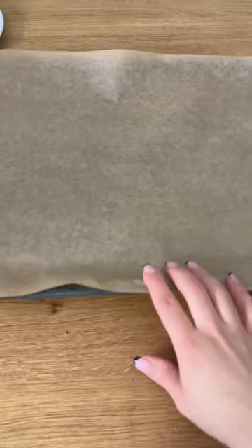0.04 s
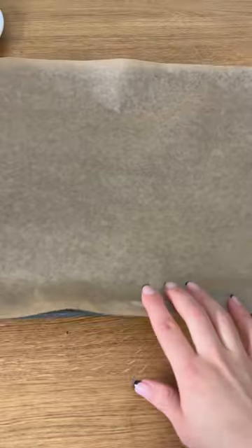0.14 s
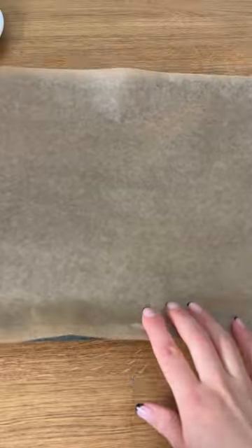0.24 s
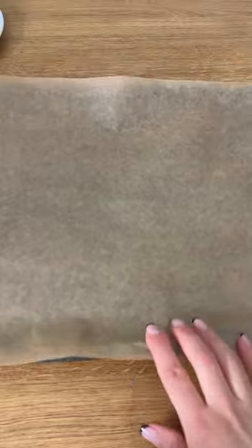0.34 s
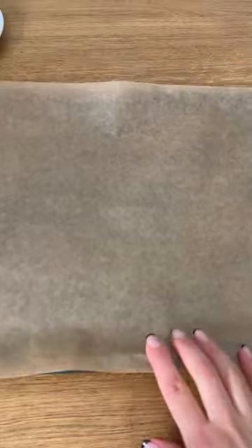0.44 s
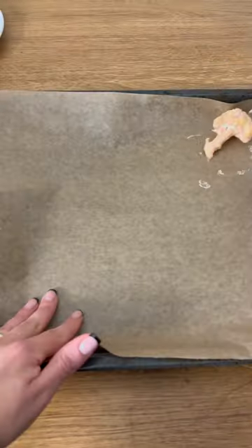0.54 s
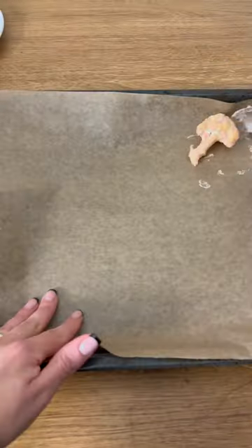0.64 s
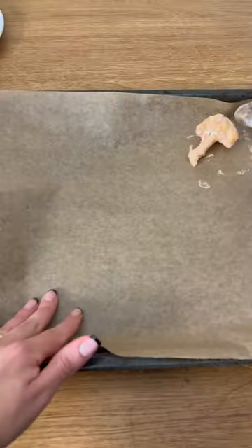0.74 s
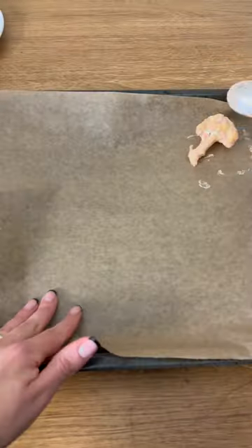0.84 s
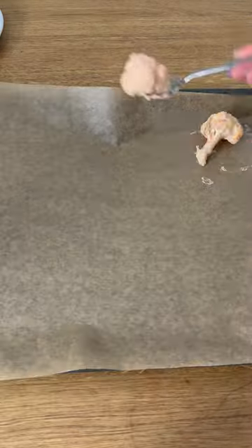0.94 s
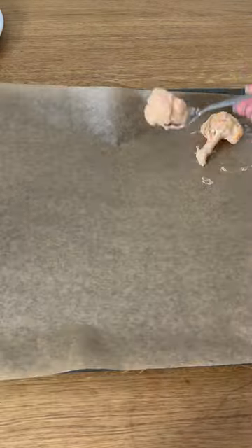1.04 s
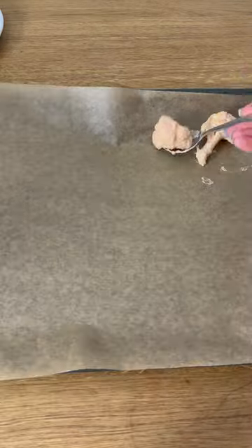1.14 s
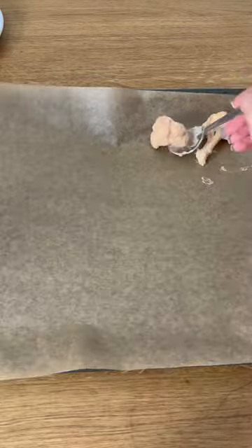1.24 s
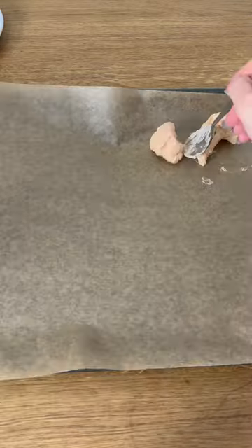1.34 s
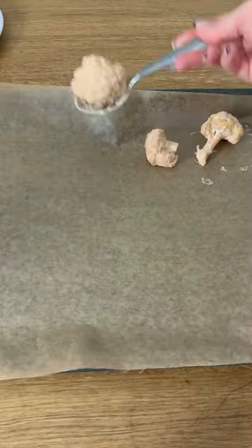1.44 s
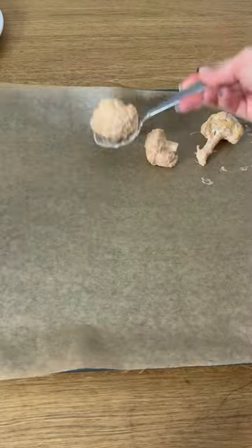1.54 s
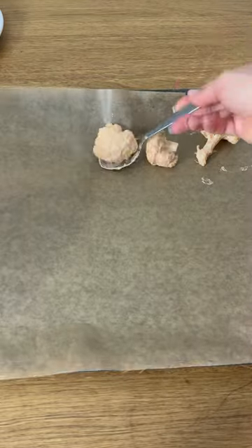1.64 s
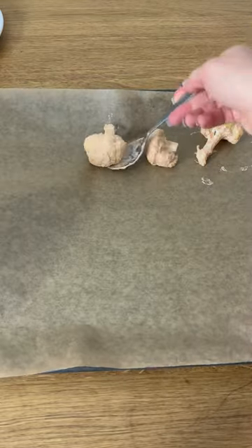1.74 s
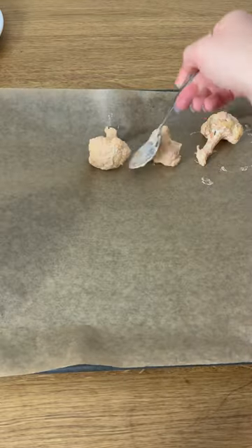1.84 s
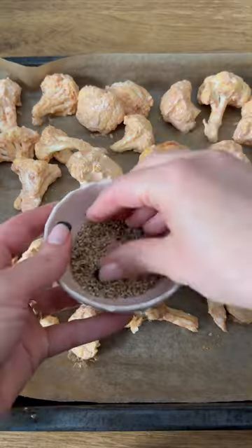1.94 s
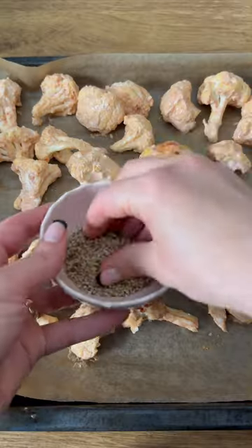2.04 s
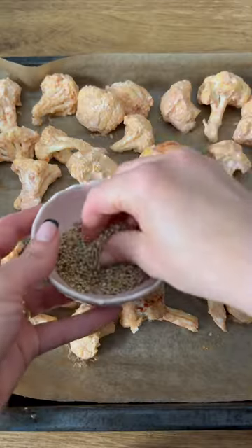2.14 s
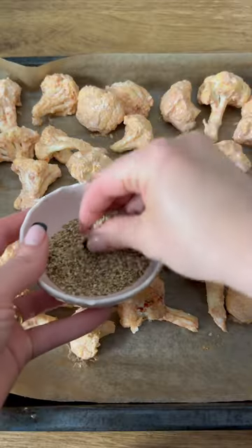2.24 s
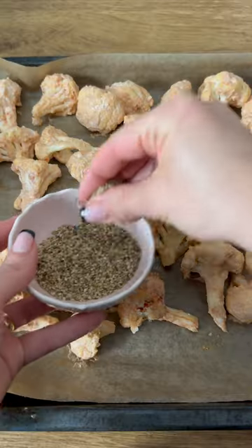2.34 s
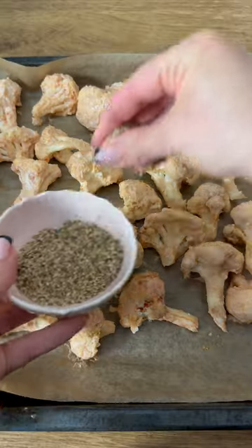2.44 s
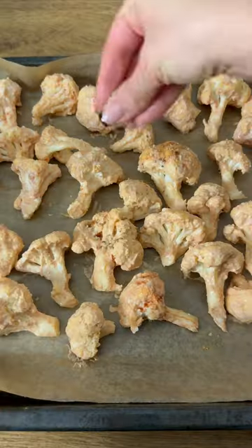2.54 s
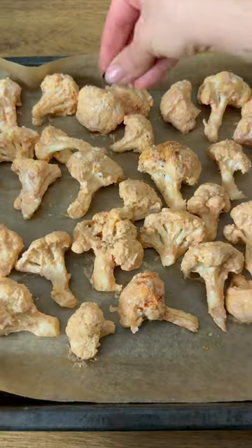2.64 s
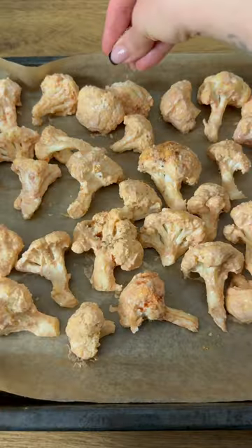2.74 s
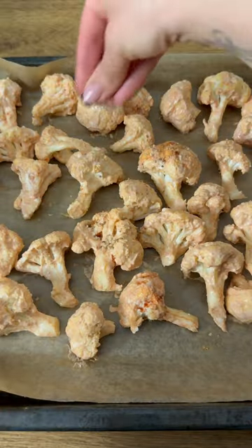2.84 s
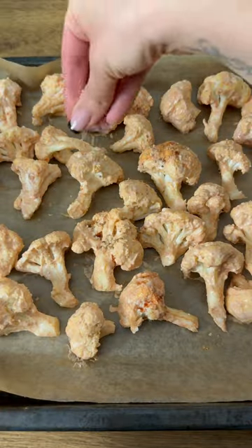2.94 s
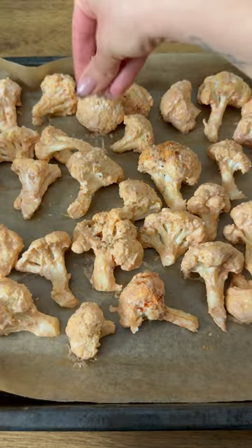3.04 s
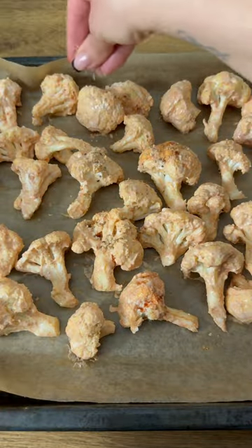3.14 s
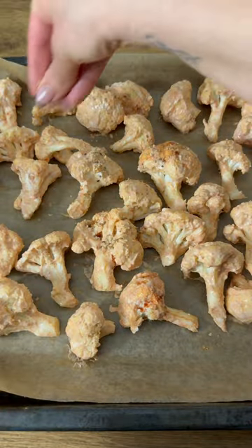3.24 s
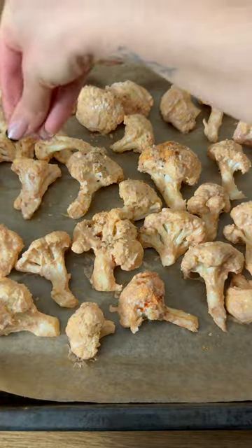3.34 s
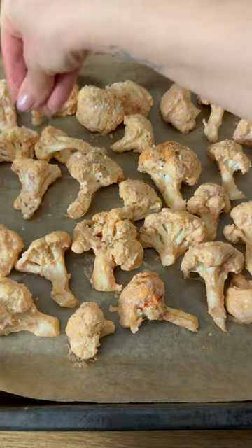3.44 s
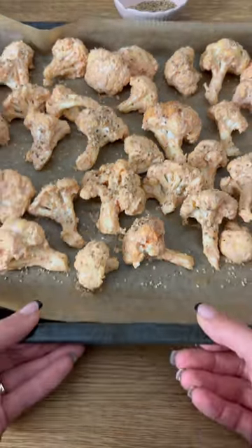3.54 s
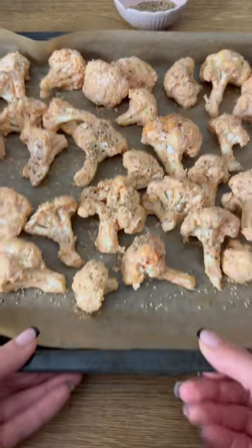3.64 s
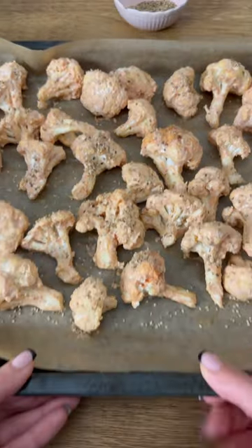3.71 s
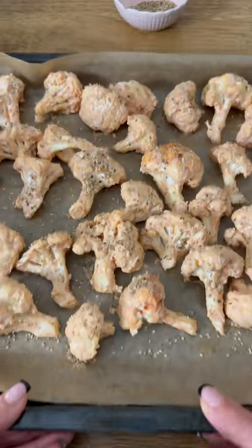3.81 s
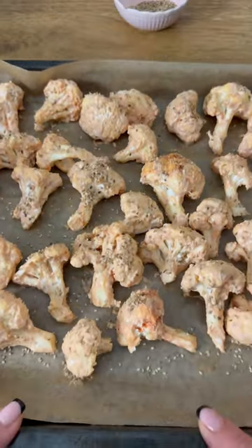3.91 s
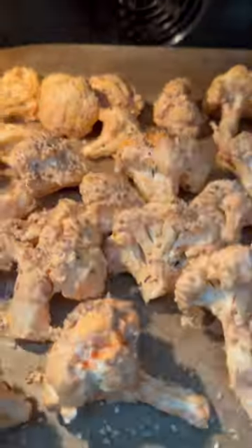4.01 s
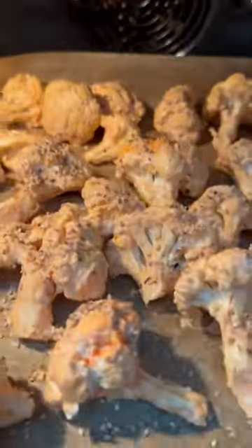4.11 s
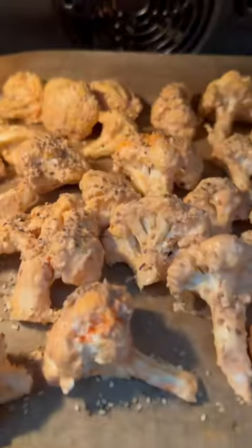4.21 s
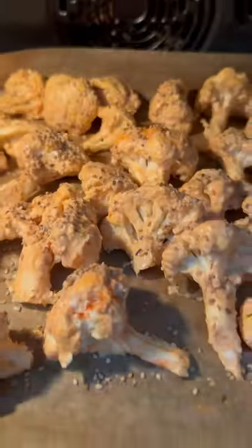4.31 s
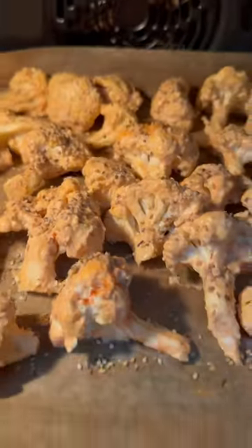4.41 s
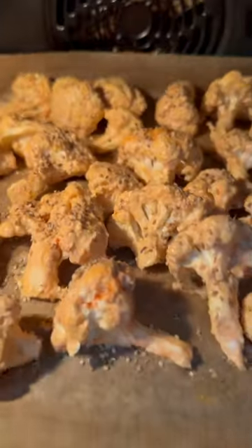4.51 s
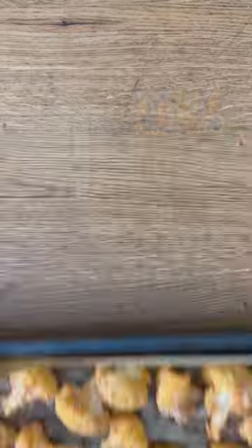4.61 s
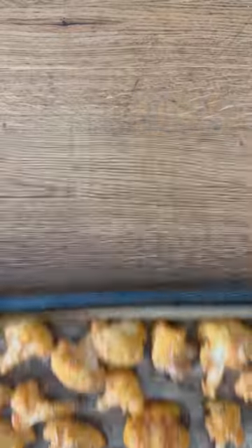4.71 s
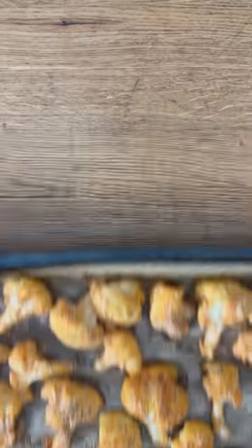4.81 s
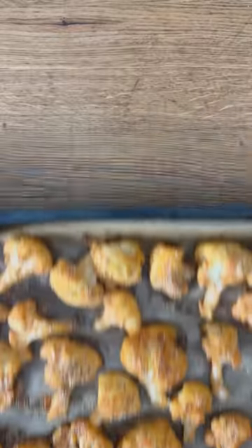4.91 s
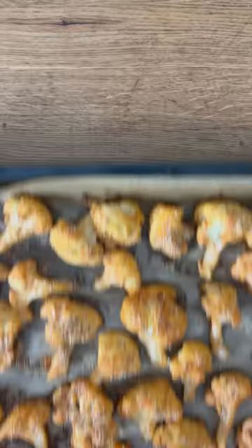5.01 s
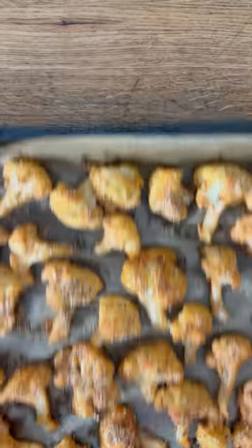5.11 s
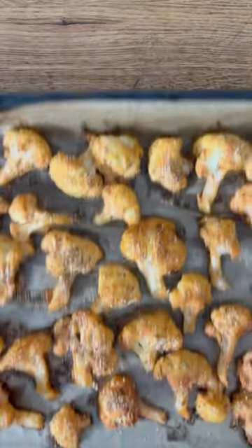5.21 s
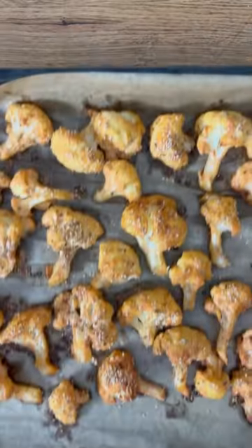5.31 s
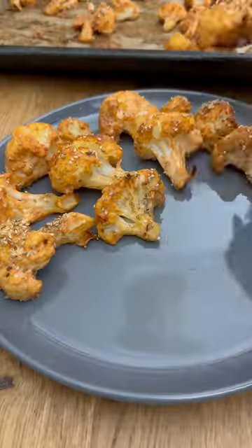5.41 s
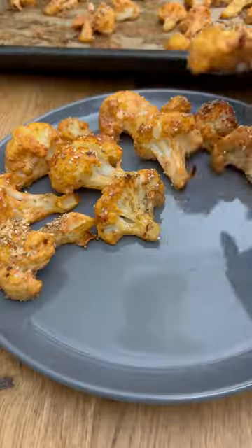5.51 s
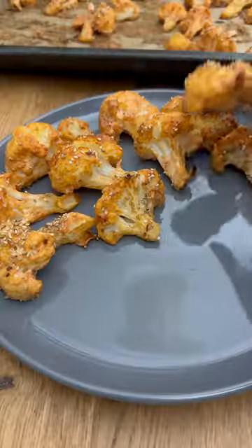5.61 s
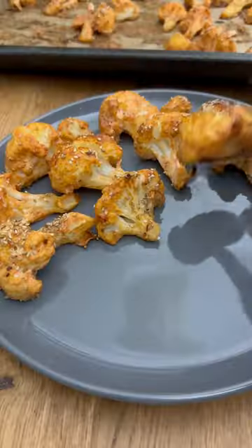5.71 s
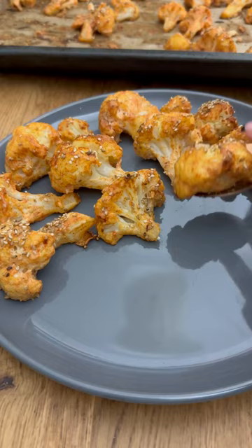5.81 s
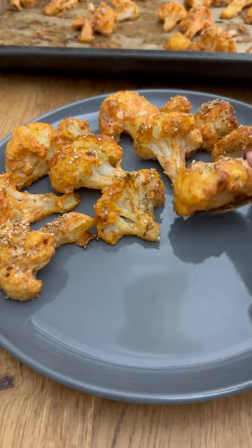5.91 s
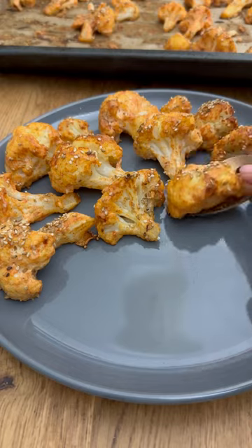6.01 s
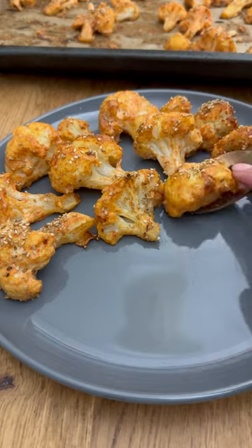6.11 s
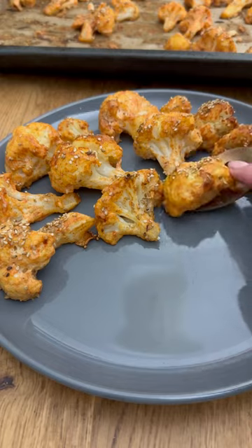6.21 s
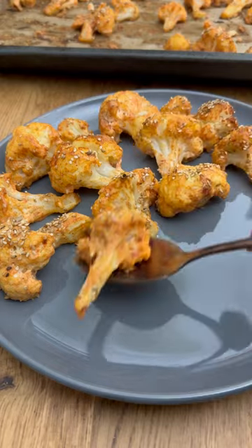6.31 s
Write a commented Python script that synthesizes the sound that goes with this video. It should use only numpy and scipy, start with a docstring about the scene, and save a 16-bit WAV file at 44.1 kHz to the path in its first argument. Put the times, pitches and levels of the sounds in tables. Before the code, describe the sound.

Dry, close stereo sounds of cooking in a small room with a short echo: tray friction on wood, crisp paper creases, a soft wet thud and a sharp papery crunch, then gritty herbs and tiny seed ticks. Metal scrapes and drones into the oven, ending in a loud rattling clank with a low boom. A broad wooden slide follows, then very quiet moist crackles over low room air.

```python
"""Small kitchen, close above the worktop: cauliflower is baked.
A paper-lined tray slides over wood; florets drop on the paper, herbs are rubbed, seeds sprinkled.
The tray scrapes along oven rails, clanks on the stop, slides on wood again; a fork moves soft food.
Friction and crackle are coloured random grains, metal is ringing resonances, plus a diffuse echo.
Levels in the tables are relative, ahead of the mix gains."""
import sys
import numpy as np
from scipy import signal
from scipy.fft import rfft, irfft, next_fast_len
from scipy.io import wavfile
from scipy.ndimage import uniform_filter1d

SR = 44100
rng = np.random.default_rng(int(sys.argv[2]) if len(sys.argv) > 2 else 0)


def wav_record(signal):
    """Record a signal, one row per channel, as 16-bit PCM in the file named by sys.argv[1]."""
    frames = np.transpose(np.atleast_2d(signal))
    bounded = np.clip(frames, -1, 1)
    # unit amplitude maps onto the largest positive 16-bit level
    quanta = np.round(bounded * 32767).astype(np.int16)
    wavfile.write(sys.argv[1], SR, quanta)


N = 280476

# spectrum of snapping paper and rubbed herbs: f/Hz, level/dB per Hz
CRACKLE_TONE = [(300, -11), (800, -11.5), (1300, -1), (2000, -1.5), (2700, 0.5), (4500, -6), (7000, -1),
                (10000, -1.5), (13000, -15.5), (15500, -2)]


def amp(db):
    """Decibels to gain."""
    return 10 ** (np.asarray(db) / 20)


def unit(x):
    """Scale to rms 1."""
    return x / np.sqrt(np.mean(x ** 2) + 1e-20)


def at_hz(points, hz):
    """Interpolate a table on a log-frequency axis."""
    f, value = np.transpose(points)
    return np.interp(np.log(np.maximum(hz, 1)), np.log(f), value)


def convolve(x, response):
    """Pass a mono sound through a mono or stereo response."""
    return signal.oaconvolve(np.atleast_2d(x), np.atleast_2d(response), axes=1)[:, :N]


def causal(spectrum, size=8192):
    """Minimum-phase response of a spectrum, falling 12 dB/octave further below its first point."""
    hz = np.maximum(np.fft.rfftfreq(size, 1 / SR), 1)
    gain = amp(at_hz(spectrum, hz)) * np.minimum(hz / spectrum[0][0], 1) ** 2
    cepstrum = irfft(np.log(gain))
    # fold the cepstrum onto positive time
    cepstrum[1:size // 2] *= 2
    cepstrum[size // 2 + 1:] = 0
    return irfft(np.exp(rfft(cepstrum)))


def colour(x, spectrum):
    """Shape a white excitation, keeping its power."""
    response = causal(spectrum)
    return convolve(x, response / np.linalg.norm(response))[0]


def drift(rate):
    """Slow random curve, linear between normal knots at `rate` per second."""
    knots = np.arange(N) / SR * rate
    return np.interp(knots, np.arange(2000), rng.standard_normal(2000))


def grains(per_s, spread_db):
    """Random tiny slips of uneven size and either sign; rms 1."""
    born = np.flatnonzero(rng.random(N) < per_s / SR)
    sign = rng.choice([-1, 1], len(born))
    size_db = spread_db * np.minimum(rng.exponential(1, len(born)), 4)
    slips = np.zeros(N)
    slips[born] = sign * amp(size_db)
    return unit(slips)


def click(t_s, db):
    """One-sample impulse."""
    return amp(db) * (np.arange(N) == int(t_s * SR))


def ring(x, hz, t60):
    """Two-pole resonance: a unit click rings a decaying sine of height 1."""
    r, w = amp(-60 / (t60 * SR)), 2 * np.pi * hz / SR
    return signal.lfilter([0, np.sin(w)], [1, -2 * r * np.cos(w), r * r], x + 1e-18)


def resonate(x, peaks, wander, swell_db):
    """Parallel resonances under friction, straying in level and pitch as the contact moves; rms 1."""
    n, out = np.arange(N), 0
    for hz, width_hz, db in peaks:
        ringing = unit(ring(x, hz, np.log(1000) / np.pi / width_hz))
        level = amp(db + swell_db * drift(rate=17))
        warped_n = n + np.cumsum(wander * drift(rate=14))
        out = out + level * np.interp(warped_n, n, ringing)
    return unit(out)


def swell(crest_s, db, rise_s, t60_s):
    """Power envelope of one contact: 20 dB up per rise time, then an exponential decay."""
    out = np.zeros(N)
    first = max(int((crest_s - 2 * rise_s) * SR), 0)
    last = min(int((crest_s + t60_s) * SR), N)
    at = np.arange(first, last)
    t = at / SR - crest_s
    out[at] = amp(db + np.where(t < 0, 20 * t / rise_s, -60 * t / t60_s)) ** 2
    return out


def bursts(rows, rise_s):
    """Amplitude envelope of sharp contacts, each cresting one rise time after its table time."""
    return np.sqrt(sum(swell(s + rise_s, db, rise_s, t60) for s, db, t60 in rows))


def presses(rows, rise_share):
    """Amplitude envelope of soft contacts: rise is a share of t60, so slow presses fade slowly too."""
    return np.sqrt(sum(swell(s, db, rise_share * t60, t60) for s, db, t60 in rows))


def strokes(rows, attack_s, release_t60_s, arch_db=0):
    """Gain of hand movements: set in, hold with a steady change and optional arch, run out."""
    t, power = np.arange(N) / SR, 1e-20
    for start, length, db, change_db in rows:
        done = np.clip((t - start) / length, 0, 1)
        attack = np.clip((t - start) / attack_s, 0, 1)
        held = amp(db + change_db * done + arch_db * np.sin(np.pi * done))
        released = np.maximum(t - start - length, 0) / release_t60_s
        power = power + (attack * held * np.exp(-np.log(1000) * released)) ** 2
    return np.sqrt(power)


def strike(rows, modes, uneven_db):
    """Blows ring all modes; the higher the mode, the more its strength depends on the spot hit."""
    s, db, _ = np.transpose(rows)
    # light bounces mostly tick: the ring falls faster than their level
    ring_db = db.max() + 1.4 * (db - db.max())
    spot_db = uneven_db * rng.standard_normal((len(rows), len(modes)))
    out = np.zeros(N)
    for k, (hz, mode_db, t60) in enumerate(modes):
        blow_db = ring_db + mode_db + spot_db[:, k] * min(hz / 1500, 1)
        clicks = np.zeros(N)
        clicks[(s * SR).astype(int)] = amp(blow_db) * (-1) ** k
        out += ring(clicks, hz, t60)
    return out


def low_cut(x, hz):
    """High-pass filter: thin out the bass below hz."""
    return signal.sosfilt(signal.butter(3, hz, "high", fs=SR, output="sos"), x)


def pan(db):
    """Left and right gains for a level difference."""
    return amp(np.array([[.5], [-.5]]) * db)


def widen(mid, side, width):
    """Two unrelated noises, as mid and side, become left and right."""
    return mid + convolve(side, causal(width)) * [[1], [-1]]


def ports(x, phase):
    """Two microphone ports: a frequency-dependent phase lead, half on each side, vanishing in the bass."""
    size = next_fast_len(N + SR // 10, real=True)
    hz = np.fft.rfftfreq(size, 1 / SR)
    lead = at_hz(phase, hz) * np.minimum(hz / phase[0][0], 1) ** 2
    turn = lead * np.array([[.5], [-.5]])
    return irfft(rfft(x, size) * np.exp(1j * turn), size)[:, :N]


def kitchen(x, wet_db, count=16):
    """Direct sound plus a short diffuse tail that dies band by band."""
    # echo decay: f/Hz, t60/s
    room_t60 = [(100, 0.68), (500, 0.34), (2000, 0.28), (8000, 0.27), (15000, 0.036)]
    # left-right likeness of the echo: f/Hz, correlation/1
    likeness = [(350, 1), (800, .1), (2000, .6), (10000, 0.22)]
    t, tail = np.arange(SR // 2) / SR, 0
    edges_hz = np.geomspace(60, 17000, count + 1)
    for low, high in zip(edges_hz, edges_hz[1:]):
        hz = np.sqrt(low * high)
        band = signal.butter(2, [low, high], "band", fs=SR, output="sos")
        mid, side = signal.sosfilt(band, rng.standard_normal((2, len(t))))
        alike = np.clip(at_hz(likeness, hz), -1, 1)
        dying = np.exp(-np.log(1000) * t / at_hz(room_t60, hz))
        stereo = np.sqrt(1 + alike) * mid + np.sqrt(1 - alike) * side * [[1], [-1]]
        tail = tail + dying * stereo
    tail = tail * np.minimum(t / 0.0011, 1)
    return x + amp(wet_db) * convolve(x, tail / np.linalg.norm(tail[0]))


def break_off(x):
    """The sound and its echo are muted abruptly over fixed spans."""
    # hushes: start t/s, end t/s
    hush_rows = [(.947, 1.15), (1.945, 1.98), (3.52, 4), (5.455, 6.4)]
    t = np.arange(N) / SR
    hushed = sum((t > start) & (t < end) for start, end in hush_rows)
    return x * (1 - uniform_filter1d(hushed * 1., size=400))


def room_noise():
    """Low kitchen air as wide coloured noise in an early and a late stretch, faint mains hum in the early."""
    # air stretches: start t/s, length/s, level/dB, change over length/dB
    early_rows = [(.38, 0.13, -60.5, 7), (.49, 3.5, -56, 1)]
    late_rows = [(4.6, 1.8, -51, 0.83)]
    # air spectra: f/Hz, level/dB per Hz
    early_tone = [(35, -12.5), (60, -7.5), (100, -9.5), (150, -4), (290, -7.5), (500, -12), (800, -22),
                  (1200, -33), (2200, -47), (5000, -50.5), (9000, -48), (14000, -62.5)]
    late_tone = [(35, -11.5), (140, 0), (420, -15.5), (650, -16), (900, -28), (5000, -43.5), (7500, -41.5),
                 (14000, -59)]
    # stereo width: f/Hz, side minus mid level/dB
    air_width = [(100, -22.5), (950, 2), (5980, -4)]
    hum_hz, hum_db = 97.2, -58.5
    before, after = (strokes(rows, attack_s=0.038, release_t60_s=.3) for rows in (early_rows, late_rows))
    early = widen(*(colour(before * rng.standard_normal(N), early_tone) for _ in range(2)), air_width)
    late = widen(*(colour(after * rng.standard_normal(N), late_tone) for _ in range(2)), air_width)
    sine = unit(np.sin(2 * np.pi * hum_hz * np.arange(N) / SR))
    hum = amp(hum_db + 3.5 * drift(rate=11)) * before / before.max() * sine
    return early + late + hum


def glance(x, size=1024):
    """Each block of samples has its own short echo, as off the tray, so ticks differ in colour."""
    delay_s = np.repeat(rng.uniform(.0002, .001, N // size + 1), size)[:N]
    echo = x[np.maximum(np.arange(N) - (delay_s * SR).astype(int), 0)]
    return .9 * x + .4 * echo


def fork():
    """Soft florets give way in faint wet crackles; each touch squeaks at its own pitch."""
    # fork presses: crest t/s, f/Hz, level/dB
    touches = [(5.645, 1350, -65.5), (5.866, 1280, -62), (5.98, 2670, -67), (6.12, 2450, -69.5),
               (6.18, 2830, -71), (6.213, 2550, -70.5), (6.341, 1450, -67.5)]
    # wet crackle spectrum: f/Hz, level/dB per Hz
    wet_tone = [(1300, 8), (2000, -9), (5000, -9.5), (7500, -3), (15500, -33)]
    cycles = 24  # t60 of a squeak, in periods
    crackle = grains(per_s=1100, spread_db=2.5)
    wet = amp(-2.5) * colour(crackle, wet_tone)
    out = np.zeros(N)
    for s, hz, db in touches:
        press = np.sqrt(swell(s, db, rise_s=0.019, t60_s=0.18))
        out += press * (wet + unit(ring(crackle, hz, cycles / hz)))
    return out


def seasoning():
    """Herbs crackle between fingers; seeds tick on the paper over a finer trickle."""
    # herb rubs: crest t/s, level/dB, t60/s
    rubs = [(2.06, -54.5, 0.49), (2.445, -59, 0.1)]
    # loudest seeds landing: t/s, level/dB
    seed_rows = [row[:2] for row in [(2.5539, -19), (2.589, -35), (2.6032, -25), (2.637, -28),
                                     (2.6413, -20.5), (2.652, -24), (2.6613, -22), (2.677, -22),
                                     (2.696, -22), (2.699, -20.5), (2.7016, -19), (2.752, -26.5),
                                     (2.758, -27.5), (2.782, -33), (2.872, -29.5), (2.9616, -28.5),
                                     (2.9872, -28), (2.9913, -17), (2.9939, -16.5), (2.9994, -26),
                                     (3.038, -24), (3.057, -23), (3.074, -27), (3.0925, -22), (3.095, -16),
                                     (3.1022, -18), (3.1226, -24), (3.1519, -22.5), (3.2807, -27),
                                     (3.2933, -25), (3.383, -24), (3.397, -19.5), (3.413, -25),
                                     (3.4417, -23.5), (3.458, -19.5), (3.4861, -23.5), (3.5018, -21)]]
    # pinches let go: start t/s, length/s, level/dB, change over length/dB
    pinch_rows = [(2.535, 0.096, -50.5, -9), (2.66, 0.054, -50.5, 5), (3.0, 0.14, -55, 6),
                  (3.27, 0.026, -51.5, 0), (3.38, 0.053, -45, 2.5)]
    # seed spectrum: f/Hz, level/dB per Hz
    seed_tone = [(900, -19), (1600, -10), (3000, -5.5), (5000, -8.5), (7500, -1.5), (10000, -0.5),
                 (12500, -8.5), (15500, -1.5)]
    seed_t60_s = .009
    herbs = presses(rubs, rise_share=0.17) * grains(per_s=5300, spread_db=2.5)
    tick_env = bursts([(s, db, seed_t60_s) for s, db in seed_rows], rise_s=0.00038)
    ticks = amp(-5.5) * tick_env * rng.standard_normal(N)
    pour = strokes(pinch_rows, attack_s=0.013, release_t60_s=0.76)
    trickle = pour * grains(per_s=1700, spread_db=4.0)
    return colour(herbs, CRACKLE_TONE) + colour(glance(ticks, size=256) + trickle, seed_tone)


def paper():
    """Creases snap, the sheet shifts, and spoon and florets crush it in showers of tiny buckles."""
    # crease snaps: t/s, level/dB
    snap_rows = [(0.042, -29), (0.329, -26), (.498, -37), (0.527, -39), (0.565, -25.5), (0.6536, -31),
                 (0.719, -30.5), (0.7488, -26), (0.827, -28.5), (0.8395, -27), (0.8967, -20),
                 (0.897, -20.5), (1.599, -24.5), (1.608, -26), (1.6346, -15.5), (1.647, -13.5),
                 (1.735, -22), (1.822, -32.5), (1.829, -37), (1.842, -34), (4.882, -27.5), (4.913, -19),
                 (4.9155, -26), (5.233, -28.5)]
    # hand shifts the paper: start t/s, length/s, level/dB, change over length/dB
    shift_rows = [(.5, 0.14, -52, -2), (.73, 0.17, -56, -9), (.9, 0.032, -50, -3)]
    # crushes: crest t/s, level/dB, t60/s
    crush_rows = [(1.27, -48.5, 0.16), (1.385, -43, 0.072), (1.614, -32.5, 0.069), (1.646, -22.5, 0.11),
                  (1.69, -34, 0.13), (1.742, -34, 0.18), (1.832, -37, 0.073), (1.88, -48.5, 0.12)]
    # crush spectrum: f/Hz, level/dB per Hz
    crush_tone = [(100, -13), (200, 0.5), (500, -1.5), (900, -8), (1500, 6.5), (2150, 3), (2700, 7.5),
                  (3600, 2.5), (5000, -0.5), (7000, 0), (10000, -5.5), (12000, -26), (15500, -17)]
    snap_t60_s = 0.018
    snap_env = bursts([(s, db, snap_t60_s) for s, db in snap_rows], rise_s=0.0012)
    snaps = amp(-7.0) * snap_env * rng.standard_normal(N)
    shift_env = amp(-2.5) * strokes(shift_rows, attack_s=0.0034, release_t60_s=.15)
    shift = shift_env * grains(per_s=3900, spread_db=3.5)
    crush = presses(crush_rows, rise_share=0.18) * grains(per_s=9200, spread_db=-1.0)
    return colour(glance(snaps) + shift, CRACKLE_TONE) + colour(crush, crush_tone)


def florets():
    """A soft wet slap of noise, and the modes of the tray lying on the worktop ringing with it."""
    # florets landing: t/s, level/dB, t60/s
    thud_rows = [(1.154, -43, 0.052), (1.1615, -26.5, 0.023), (1.171, -40, 0.086), (1.195, -45, 0.66),
                 (1.647, -39, 0.11)]
    # slap spectrum: f/Hz, level/dB per Hz
    thud_tone = [(120, -1), (250, 0.5), (450, -8.5), (750, -11.5), (1200, -2.5), (2000, -11.5),
                 (3500, -21.5), (8000, -22), (15500, -34)]
    # tray modes on wood: f/Hz, level/dB, t60/s
    tray_modes = [(118.2, -11.5, 0.29), (270, -9.5, 0.13), (422, 1.5, 0.08), (472, 3.5, .22),
                  (558, -2, .22), (967, -6, 0.21), (1100, -8, .18), (1260, -6, 0.15), (1280, -2.5, 0.14),
                  (1770, -16.5, .13), (1960, -11, 0.18), (2460, -23.5, .27)]
    slap = colour(bursts(thud_rows, rise_s=0.00075) * rng.standard_normal(N), thud_tone)
    return slap + amp(-5.5) * strike(thud_rows, tray_modes, uneven_db=-0.5)


def on_wood(shoves, attack_s, release_t60_s):
    """Friction level on the worktop: shoves plus the catches that fall within them."""
    # tray catches on the wood: crest t/s, level/dB, rise/s
    catch_rows = [(.042, -49, .008), (0.183, -32.5, 0.02), (0.241, -38.5, .01), (.283, -39.5, 0.0084),
                  (0.328, -37, 0.0011), (0.365, -41, .008), (3.624, -40, 0.0086), (3.815, -33.5, .003),
                  (3.894, -37, .003), (4.673, -34.5, .012), (4.882, -34, .002), (4.911, -38, .005),
                  (4.979, -40, .01), (5.04, -42, .008), (5.13, -38.5, 0.023), (5.235, -34, 0.0049)]
    first, last = shoves[0][0], shoves[-1][0] + shoves[-1][1]
    catches = sum(swell(s, db, rise, t60_s=0.072) for s, db, rise in catch_rows if first < s < last)
    return np.sqrt(strokes(shoves, attack_s, release_t60_s) ** 2 + catches)


def broad_slide(push, tone, peaks, width, per_s, spread_db, judder_db, rub_db, ring_db):
    """The whole tray underside judders over the wood grain; the sheet rings faintly along."""
    friction = push * amp(judder_db * drift(rate=110))
    slips, side = (grains(per_s, spread_db) for _ in range(2))
    rub = widen(colour(slips * friction, tone), colour(side * friction, tone), width)
    sheet = friction * resonate(slips, peaks, wander=0.00595, swell_db=0.0)
    return amp(rub_db) * rub + amp(ring_db) * sheet


def scrape(push, tone, peaks, per_s, spread_db, clump_db, rub_db, ring_db):
    """The rim slips in clumps of tiny jerks, which hiss and keep the sheet metal ringing."""
    slips = unit(grains(per_s, spread_db) * amp(clump_db * drift(rate=77)))
    hiss = amp(rub_db) * colour(slips, tone)
    sheet = amp(ring_db) * resonate(slips, peaks, wander=.007, swell_db=1.0)
    return push * (hiss + sheet)


def empty_slide():
    """The empty tray rubs broadly over the wood."""
    # shoves: start t/s, length/s, level/dB, change over length/dB
    shoves = [(0.001, .045, -32.5, -3), (.06, .33, -40, -2)]
    # rub spectrum: f/Hz, level/dB per Hz
    tone = [(150, -26), (197, 9.5), (240, -7.5), (480, 2.5), (1000, -4.5), (1800, -4), (2900, 0.5),
            (6000, -5.5), (10000, -12.5)]
    # tray resonances: f/Hz, width/Hz, level/dB
    peaks = [(202, 31, -18), (510, 130, -8.5), (1950, 20, 0.5), (2330, 40, -2), (2690, 200, 4),
             (3330, 78, -4), (4120, 42, 0)]
    # stereo width: f/Hz, side minus mid level/dB
    width = [(400, -17), (950, -2.5), (3770, -9), (7520, -3.5)]
    push = on_wood(shoves, attack_s=0.0013, release_t60_s=0.28)
    return broad_slide(push, tone, peaks, width, per_s=5000, spread_db=2.5, judder_db=1.53,
                       rub_db=-3.0, ring_db=-7.0)


def loaded_slide():
    """The loaded tray scrapes on its rim over the wood."""
    # shoves: start t/s, length/s, level/dB, change over length/dB
    shoves = [(3.505, 0.067, -56, 11), (3.585, 0.1, -39.5, -5), (3.68, 0.12, -47, 12),
              (3.81, 0.084, -39, -1)]
    # scrape spectrum: f/Hz, level/dB per Hz
    tone = [(150, -0.5), (400, 3), (750, -7.5), (1250, 0), (2000, 1), (3000, -3), (5000, -11.5),
            (7500, -6.5), (10000, -9), (15500, -46)]
    # resonances stirred on wood: f/Hz, width/Hz, level/dB
    peaks = [(1280, 200, 0), (1830, 150, -4.5), (2470, 79, -21)]
    push = on_wood(shoves, attack_s=0.013, release_t60_s=0.11)
    return scrape(push, tone, peaks, per_s=2600, spread_db=1.0, clump_db=2.5, rub_db=-3.5, ring_db=-6.5)


def baked_slide():
    """The tray with the baked florets rubs broadly over the wood."""
    # shoves: start t/s, length/s, level/dB, change over length/dB
    shoves = [(4.639, 0.18, -33.5, -8), (4.825, 0.091, -35.5, -1), (4.945, 0.13, -38.5, -4.5),
              (5.11, 0.19, -46, -0.5), (5.265, 0.053, -43.5, 3.5), (5.35, 0.092, -53.5, -6)]
    # rub spectrum: f/Hz, level/dB per Hz
    tone = [(60, -5), (180, -16), (265, 0.5), (390, -7), (850, -11.5), (1150, -9.5), (1600, -7),
            (2100, -9.5), (2950, -12.5), (4600, -19.5), (8000, -16.5), (15500, -30)]
    # tray resonances: f/Hz, width/Hz, level/dB
    peaks = [(225, 20, 0), (271, 25, 3), (965, 51, 0.5), (1155, 25, -0.5), (1413, 40, 1), (1574, 36, 1),
             (1767, 36, 1)]
    # stereo width: f/Hz, side minus mid level/dB
    width = [(120, -24), (950, -6.5), (3770, -5), (7520, -30)]
    push = on_wood(shoves, attack_s=0.018, release_t60_s=0.36)
    return broad_slide(push, tone, peaks, width, per_s=5500, spread_db=2.0, judder_db=1.5,
                       rub_db=0.0, ring_db=-6.0)


def squeals():
    """Where the rim grips, one resonance of the sheet sings out for a moment."""
    # squeals: crest t/s, f/Hz, level/dB, t60/s
    squeal_rows = [(.04, 2610, -34.5, 0.1), (0.334, 3800, -34.5, 0.042), (.372, 2760, -39.5, 0.08),
                   (3.625, 1290, -40.5, .15), (3.822, 2090, -38, 0.091), (4.12, 778, -37.5, 0.25),
                   (4.265, 1670, -40, 0.19), (4.275, 934, -34.5, .2), (4.42, 930, -40, .2),
                   (4.42, 915, -39, 0.18), (4.675, 2100, -44, 0.17), (5.24, 1223, -42.5, 0.076),
                   (5.245, 1600, -42, 0.13)]
    cycles = 49  # t60 of the resonance, in periods
    out = np.zeros(N)
    for s, hz, db, t60 in squeal_rows:
        grip = presses([(s, db, t60)], rise_share=0.17)
        out += grip * unit(ring(rng.standard_normal(N), hz, cycles / hz))
    return out


def rumble():
    """Steady pressure on the rails keeps the oven walls droning at an even strength."""
    # pressure on the rails: start t/s, length/s, level/dB, change over length/dB
    rumble_rows = [(4.008, 0.196, -31.5, 0), (4.195, .26, -28, -6)]
    # wall resonances: f/Hz, width/Hz, level/dB
    wall_peaks = [(128, 26, -4), (174, 36, 0)]
    walls = resonate(rng.standard_normal(N), wall_peaks, wander=0.018, swell_db=2.0)
    even = walls / np.sqrt(uniform_filter1d(walls ** 2, size=1300) + 1e-3)
    return strokes(rumble_rows, attack_s=.008, release_t60_s=0.089) * low_cut(even, hz=79)


def rail_scrape():
    """The rim scrapes along the oven rails, its level arched over each stroke: fastest halfway."""
    # push along the rails: start t/s, length/s, level/dB, change over length/dB
    push_rows = [(4.006, 0.46, -34, -4.5), (4.44, 0.024, -38, 5)]
    # scrape spectrum: f/Hz, level/dB per Hz
    tone = [(260, -3.5), (550, -4.5), (900, -10), (1400, -15), (2400, -15), (5000, -25), (7000, -22),
            (10000, -19), (12000, -47)]
    # resonances stirred on the rails: f/Hz, width/Hz, level/dB
    peaks = [(288, 80, -4), (420, 55, 0), (769, 40, -2), (914, 24, -1), (1325, 40, -7), (1670, 40, -7.5),
             (2205, 88, -10), (2810, 120, -15)]
    push = strokes(push_rows, attack_s=0.0055, release_t60_s=0.095, arch_db=5.5)
    return scrape(push, tone, peaks, per_s=6000, spread_db=0.0, clump_db=1.3, rub_db=-3.0, ring_db=-4.5)


def boom():
    """The tray's weight heaves the thin oven walls for a few cycles, ending in a low thud."""
    # wall booms: t/s, f/Hz, level/dB, t60/s
    boom_rows = [(4.4797, 115, -7.5, 0.061), (4.4971, 115, -5, 0.067), (4.523, 150, -17, .09),
                 (4.556, 135, -19.5, .07), (4.575, 72, -21, 0.17)]
    return sum(ring(click(s, db), hz, t60) for s, hz, db, t60 in boom_rows)


def bend(x):
    """Bending waves in sheet steel travel at the root of frequency, so the lows of a blow arrive late."""
    top_hz, lag_s = 1502, .006  # no delay above; delay two octaves below
    size = next_fast_len(N + SR // 10, real=True)
    hz = np.minimum(np.fft.rfftfreq(size, 1 / SR), top_hz)
    turn = 2 * np.pi * lag_s * (2 * np.sqrt(top_hz * hz) - hz)
    return irfft(rfft(x, size) * np.exp(-1j * turn), size)[:N]


def clank(count=60):
    """Steel on steel: a hard knock through the sheet, a crash, and high modes crowding over low ones."""
    # tray hits the stop and rattles: t/s, level/dB, t60/s
    clank_rows = [(4.4588, -7.5, 0.014), (4.463, -5, 0.017), (4.474, -19, 0.022), (4.482, -15.5, 0.031),
                  (4.499, -20, 0.032), (4.512, -27, .03), (4.53, -34.5, .04), (4.56, -42.5, 0.07)]
    # spectra of crash and first knock: f/Hz, level/dB per Hz
    crash_tone = [(70, -18), (130, -10.5), (370, -9), (600, -17.5), (1000, -14), (1350, -17.5),
                  (1700, -24.5), (3500, -22), (5000, -26), (7500, -22.5), (10000, -21.5), (12000, -42.5)]
    knock_tone = [(150, -13), (380, -2.5), (600, -5.5), (1000, 1.5), (1450, -9.5), (1800, -24.5),
                  (6000, -42.5)]
    # tray modes in the oven: f/Hz, level/dB, t60/s
    tray_modes = [(163.6, -8.5, 0.31), (192.7, -7, 0.21), (321.3, -12.5, .28), (361, -9.5, .22),
                  (410, -9.5, .14), (455, -12.5, 0.13), (647, -15, 0.28), (782, -13, 0.16), (882, -12, .18),
                  (1050, -12.5, 0.2), (1157, -20.5, .18), (1356, -14, 0.27), (1406, -14, 0.22)]
    low_hz, high_hz, crowd_db, crowd_t60_s = 1702, 5570, -26, .19
    knock = colour(click(4.4588, db=12), knock_tone)
    crash_env = amp(3.5) * bursts(clank_rows, rise_s=0.0004)
    crash = colour(crash_env * grains(per_s=20000, spread_db=2.0), crash_tone)
    crowd_hz = low_hz * (high_hz / low_hz) ** rng.random(count)
    crowd = [(hz, crowd_db, crowd_t60_s) for hz in crowd_hz]
    ringing = amp(-8.0) * strike(clank_rows, tray_modes + crowd, uneven_db=2.5)
    return crash + bend(knock + ringing)


def scene():
    """Mix all sources with their echo levels, balances and port phases."""
    # port phase for the worktop and the oven: f/Hz, left lead/rad
    worktop_phase = [(400, 0), (1100, .5), (5500, .5), (8000, 1.24), (10300, 1.28), (12000, 3.5)]
    oven_phase = [(400, 0.72), (1100, -0.1), (2000, 1.5), (4400, 1.87), (6200, 1), (8000, 1), (10300, 3)]
    rustle = break_off(kitchen(paper(), wet_db=-8.0) + kitchen(seasoning(), wet_db=-9.5))
    landing = pan(-1.5) * kitchen(florets(), wet_db=-7.0)
    scraping = pan(-1) * kitchen(fork() + loaded_slide(), wet_db=-6.0)
    sheet = kitchen(squeals(), wet_db=-13.5)
    worktop = ports(rustle + landing + scraping + sheet, worktop_phase)
    rails = kitchen(low_cut(rail_scrape(), hz=140), wet_db=-7.5)
    push = ports(rails, oven_phase) + rumble()
    stop = ports(kitchen(clank(), wet_db=-8.5), oven_phase) + boom()
    oven = low_cut(push + stop, hz=52)
    slides = low_cut(empty_slide(), hz=150) + break_off(baked_slide())
    return worktop + oven + slides + room_noise()


def record(dry):
    """The microphone drops the deepest bass, peaks are rounded and the top is cut."""
    lean = signal.sosfilt(signal.butter(3, 42, "high", fs=SR, output="sos"), dry)
    cutoff_hz = 16200
    top_cut = signal.ellip(10, .1, 90, cutoff_hz, fs=SR, output="sos")
    return signal.sosfilt(top_cut, np.tanh(lean))


dry = scene()
out = record(dry)
wav_record(out)
```